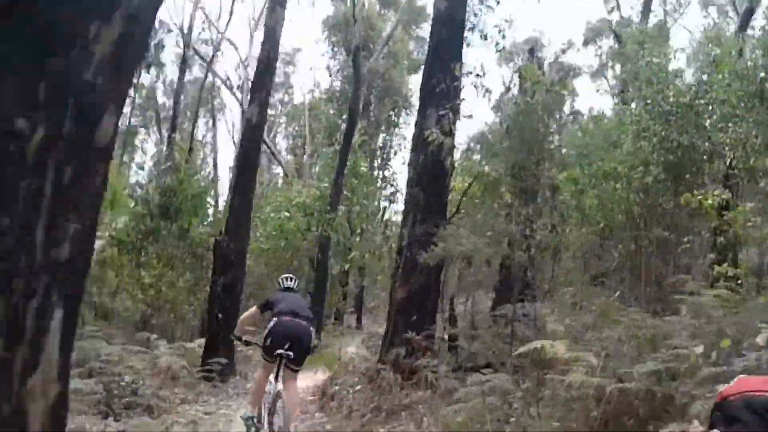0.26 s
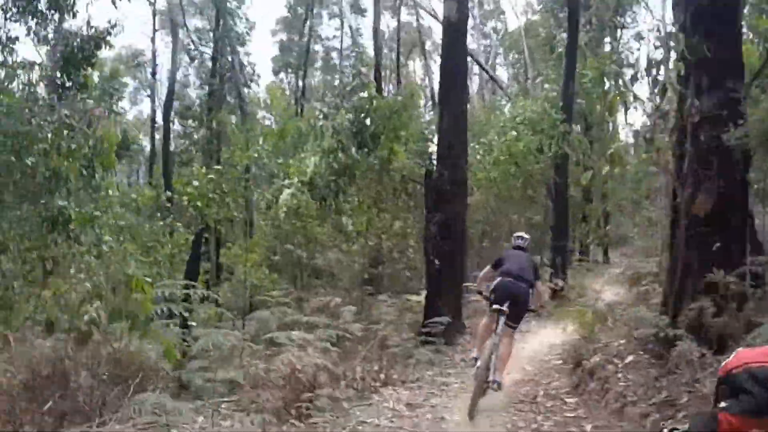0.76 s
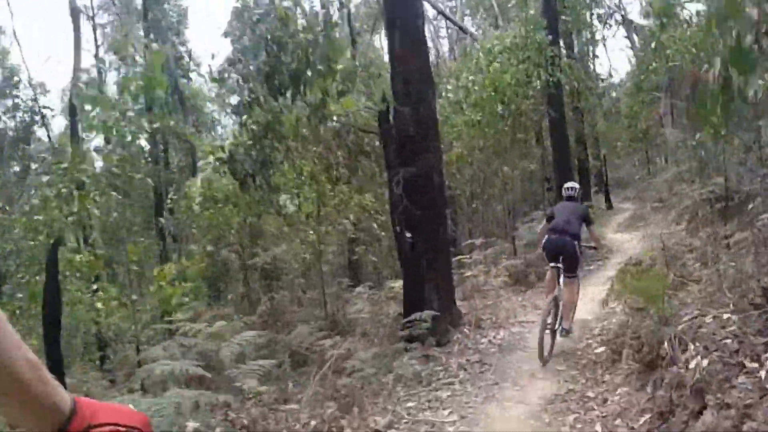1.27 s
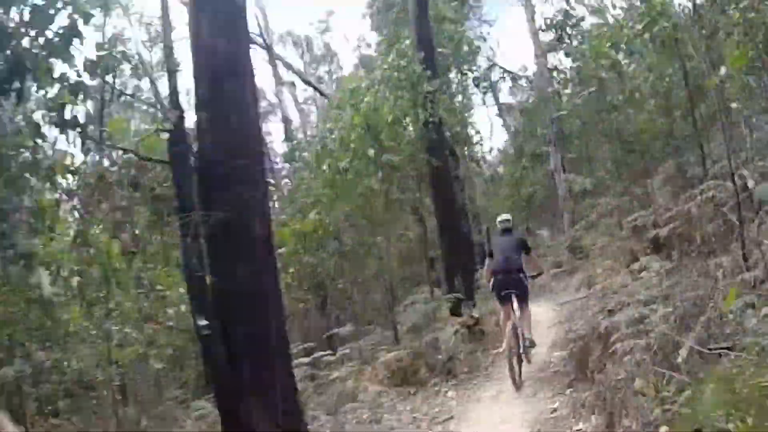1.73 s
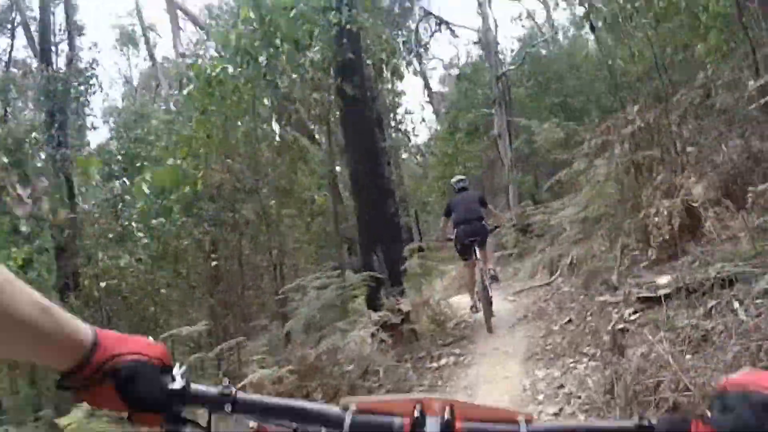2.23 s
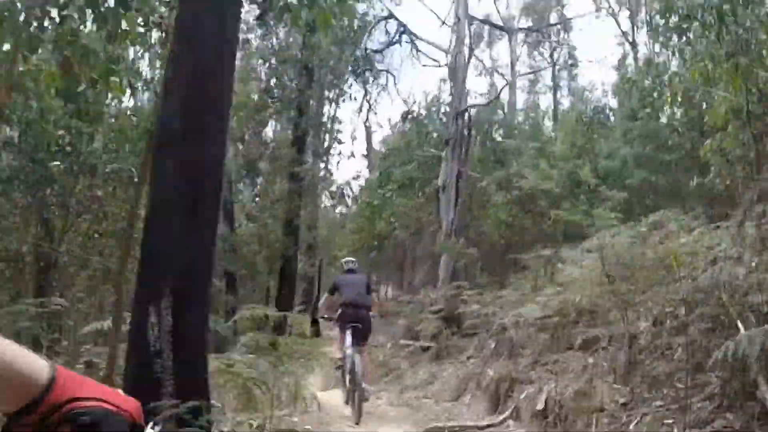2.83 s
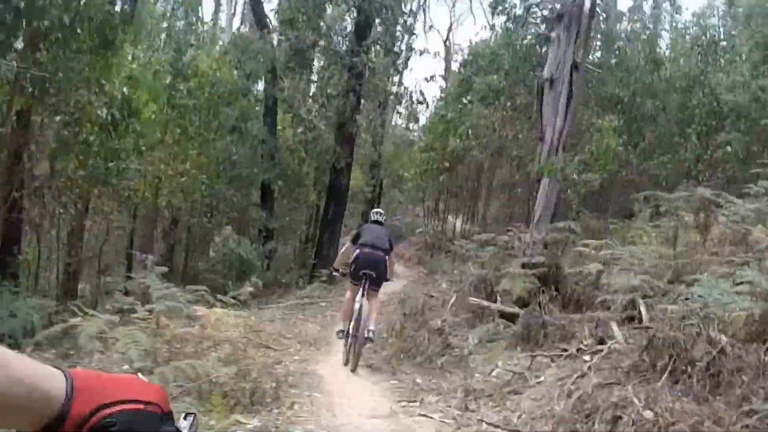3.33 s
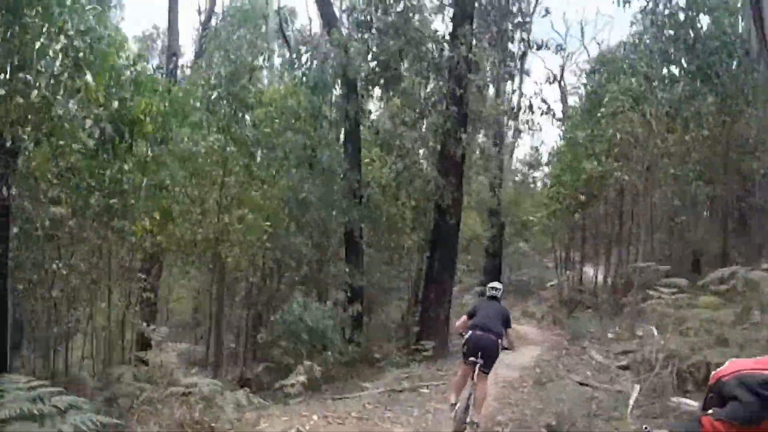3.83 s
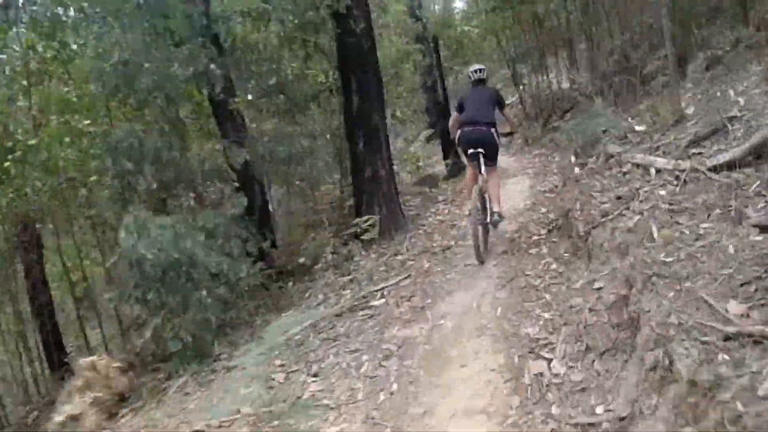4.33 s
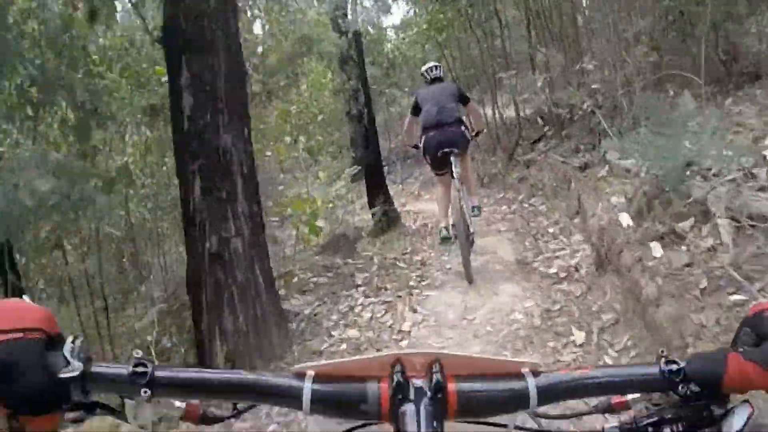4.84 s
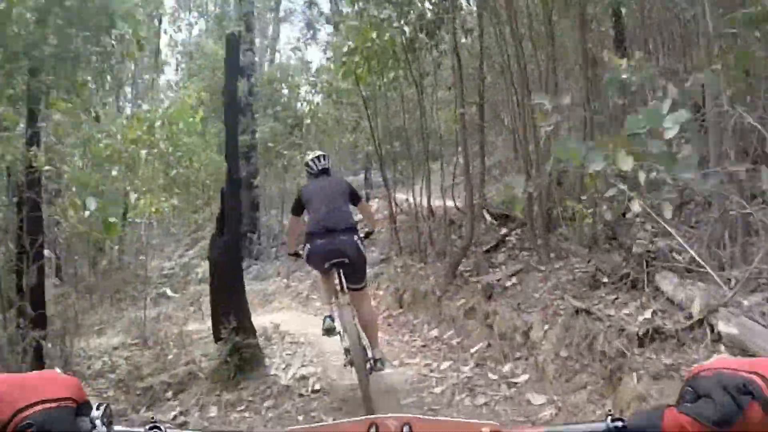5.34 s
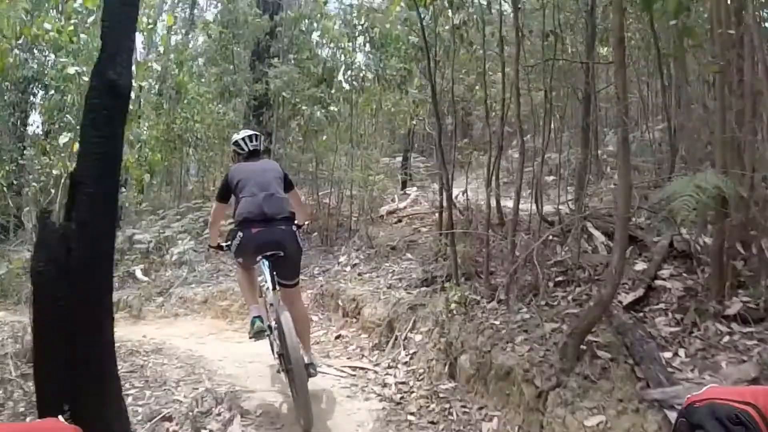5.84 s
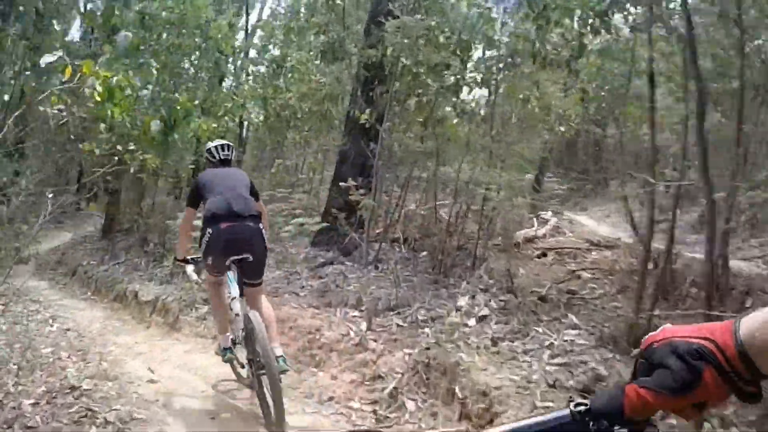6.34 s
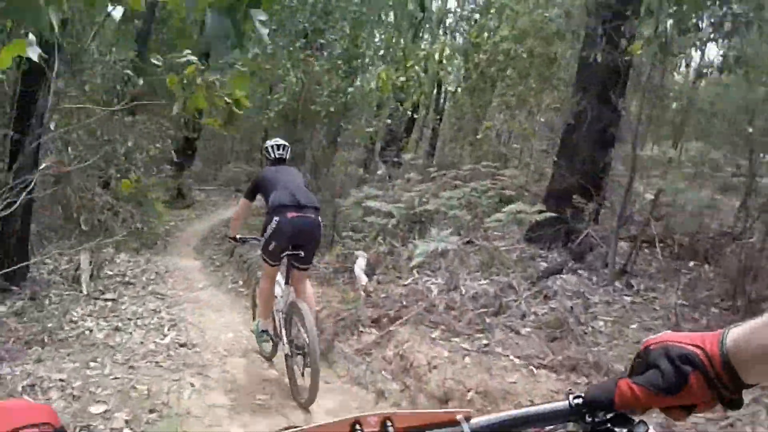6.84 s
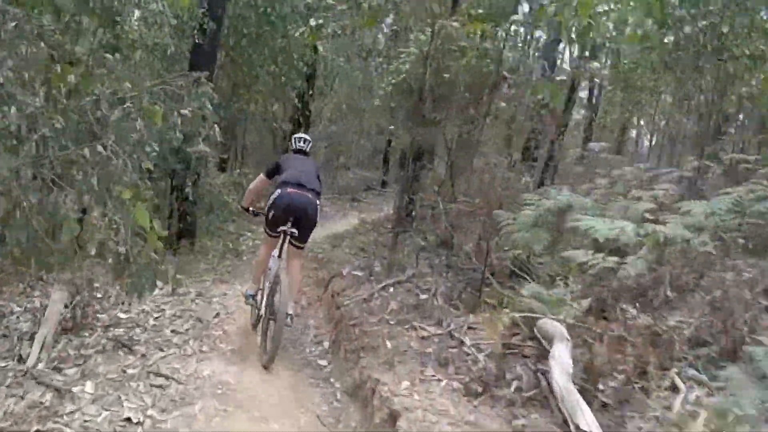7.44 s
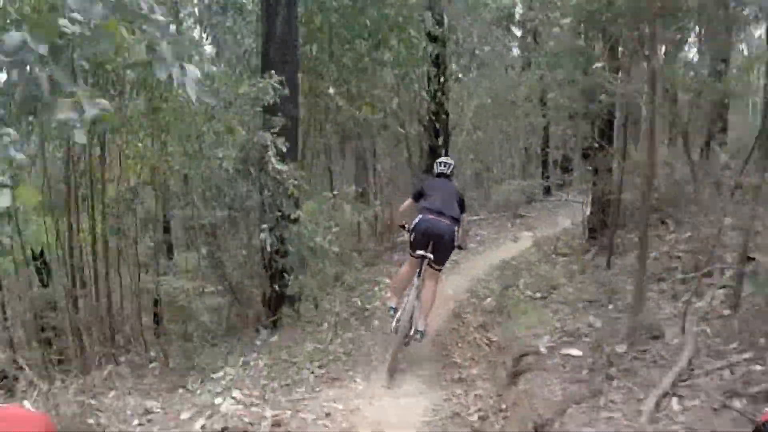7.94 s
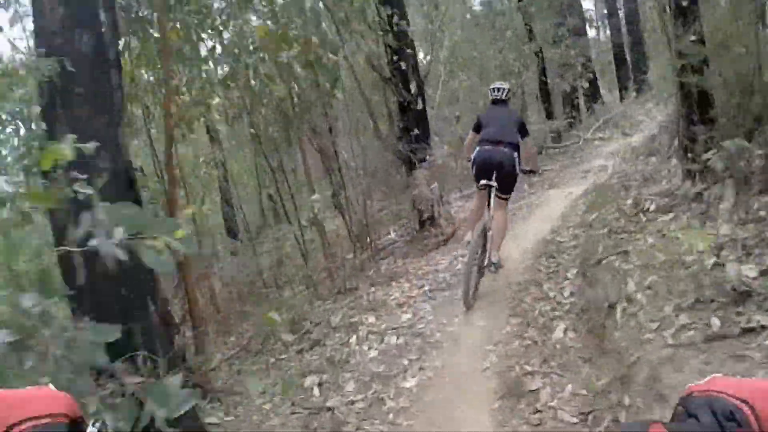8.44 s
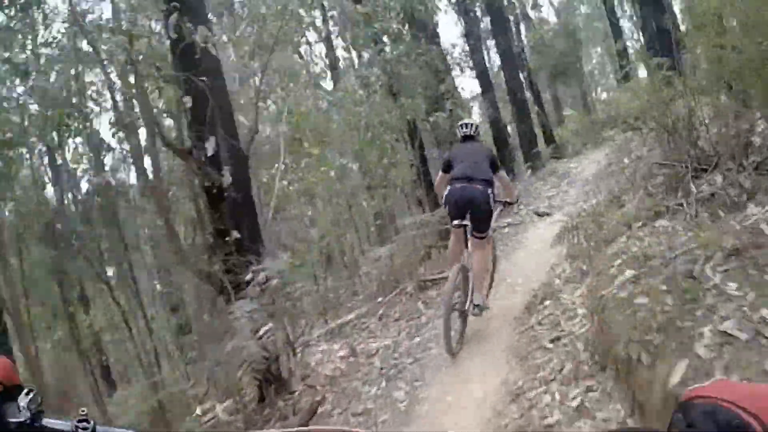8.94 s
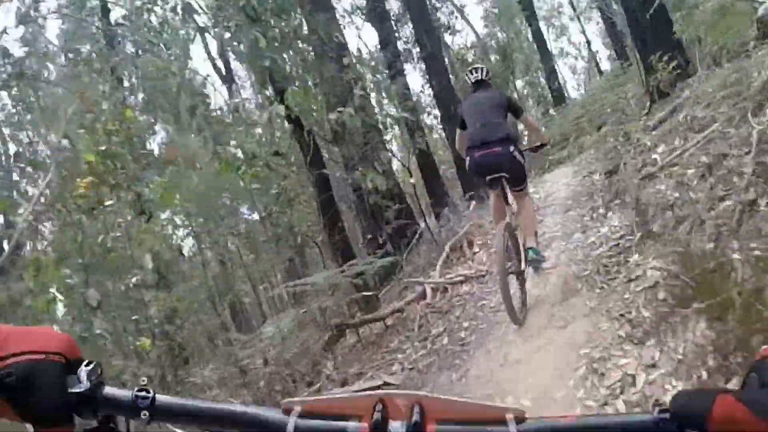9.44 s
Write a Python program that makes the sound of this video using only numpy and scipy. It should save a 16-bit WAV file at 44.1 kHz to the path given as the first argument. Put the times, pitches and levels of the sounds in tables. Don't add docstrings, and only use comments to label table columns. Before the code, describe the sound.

Muffled close sound of trail riding: whirring chain, crunching leaves, metallic chain slaps, dull frame thumps and deep wind rumble inside a closed housing.

```python
import sys
import numpy as np
from scipy import signal
from scipy.fft import rfft, irfft
from scipy.io import wavfile
from scipy.ndimage import uniform_filter1d

SR = 44100
rng = np.random.default_rng(int(sys.argv[2]) if len(sys.argv) > 2 else 0)


def boost_factor(decibels):
    exponent = np.asarray(decibels, float) / 20
    return 10 ** exponent


def waveform_to_disk(signal):
    frames = np.transpose(np.atleast_2d(signal))
    scaled = np.clip(frames, -1, 1) * 32767
    samples = np.round(scaled).astype(np.int16)
    wavfile.write(sys.argv[1], SR, samples)


N = 427329
T = np.arange(N) / SR
HZ = np.maximum(np.fft.rfftfreq(2 ** 19, 1 / SR), .1)

# time in seconds, leaf litter under the tyres in dB, frame rumble in dB,
# wind buffet in dB.
TRAIL = [(0, -75.5, -71.5, -63), (.6, -76, -72, -46.5), (1.3, -74.5, -71, -51.5), (1.9, -72.5, -70, -54),
         (2.5, -70.5, -66.5, -44), (3.3, -81, -71, -55.5), (3.95, -76, -72, -57), (4.35, -72, -67, -47.5),
         (4.85, -73, -68.5, -50.5), (5.4, -74.5, -69.5, -64.5), (6.3, -81, -76.5, -62.5),
         (6.8, -81, -73.5, -54), (7.6, -74, -72, -60.5), (8.2, -73.5, -68.5, -60),
         (8.75, -68.5, -65.5, -49), (9.15, -76.5, -68.5, -64), (9.69, -72.5, -69.5, -57.5)]
# middle in seconds, crunch in dB, half length in seconds.
PATCHES = [(0.018, -68, 0.043), (0.679, -65.5, 0.013), (0.877, -71, 0.0095), (1.044, -73, 0.054),
           (1.452, -63, 0.017), (1.492, -66.5, 0.031), (1.621, -55.5, 0.029), (1.72, -65, 0.072),
           (0.427, -75, 0.013), (2.53, -75, 0.062), (2.803, -68.5, 0.011), (2.874, -66.5, 0.014),
           (2.968, -62, 0.04), (3.042, -65.5, 0.024), (3.153, -68, 0.08), (3.42, -74, 0.038),
           (3.557, -72.5, 0.041), (3.754, -71, 0.078), (3.898, -76, 0.018), (4.066, -67, 0.015),
           (4.52, -66.5, 0.1), (4.606, -66, 0.015), (3.385, -76, 0.013), (4.196, -69, 0.016),
           (6.518, -74, 0.023), (4.652, -63, 0.023), (7.676, -63, 0.017), (7.771, -67, 0.026),
           (7.926, -75, 0.057), (8.34, -73, 0.041), (8.421, -65.5, 0.017), (8.549, -71, 0.031),
           (8.68, -70, 0.045), (8.961, -69.5, 0.056)]
# start in seconds, peak in dB, pitch in Hz.
THUMPS = [(0.215, -47, 68.4), (0.422, -47, 83), (0.5, -48.5, 84), (0.867, -47, 101), (1.307, -50, 53.6),
          (1.713, -46, 54.9), (1.787, -36.5, 126), (2.156, -40, 44.6), (2.509, -42, 160),
          (2.548, -48, 85.5), (2.621, -38.5, 125), (2.969, -37, 87), (3.098, -47, 69), (3.188, -42.5, 149),
          (3.542, -45.5, 53.6), (3.834, -44, 46.1), (3.973, -43, 44.8), (4.108, -45.5, 55),
          (4.499, -48, 59.1), (4.674, -34.5, 56), (4.787, -41, 45), (8.448, -44, 45), (8.558, -57, 67.1),
          (8.929, -59, 83.3), (9.283, -47, 44.55)]
PATCH_SQUARENESS = 4


def unit(x):
    return x / np.sqrt(np.mean(x ** 2))


def curves(table):
    s, *columns = np.transpose(table)
    return [np.interp(T, s, c) for c in columns]


def slope(points):
    hz, db = np.transpose(points)
    return boost_factor(np.interp(np.log(HZ), np.log(hz), db, left=-90, right=-90))


def modes(table):
    return np.sqrt(sum(boost_factor(2 * db) / (1 + ((HZ - hz) / (width / 2)) ** 2) ** 1.3 for hz, width, db in table))


def band(lo_hz, hi_hz):
    return 1 / np.sqrt((1 + (lo_hz / HZ) ** 4) * (1 + (HZ / hi_hz) ** 4))


def through(x, gain):
    size = 2 * len(gain) - 2
    cep = irfft(np.log(gain + 1e-9))
    cep = np.concatenate([cep[:1], 2 * cep[1:size // 2], np.zeros(size // 2)])
    return irfft(rfft(x, size) * np.exp(rfft(cep)))[:N]


def walk(rate_hz):
    k = int(SR / rate_hz)
    held = np.repeat(rng.standard_normal(N // k + 1), k)
    return 1.39 * uniform_filter1d(uniform_filter1d(held, k), k)[:N]


def evened(x, span_s, share):
    span = int(span_s * SR)
    power = uniform_filter1d(uniform_filter1d(x ** 2, span), span)
    return unit(x / power ** (share / 2))


def bursts(times_s, sizes, decay_s, click=0., rise_s=.0001):
    kicks = np.zeros(N)
    np.add.at(kicks, np.clip((np.asarray(times_s) * SR).astype(int), 0, N - 1), sizes)
    fall, rise = np.exp(-1 / (decay_s * SR)), np.exp(-1 / (rise_s * SR))
    envelope = signal.lfilter([1 - rise], np.convolve([1, -fall], [1, -rise]), kicks)
    return click * np.roll(kicks, int(rise_s * SR)) + envelope * rng.standard_normal(N)


def swells(bed_db, s, db, fade_s, squareness):
    t = T[::128, None]
    shape = np.exp(-2 * (np.abs(t - s) / np.maximum(fade_s, .005)) ** squareness)
    power = (boost_factor(2 * db) * shape).sum(axis=1)
    return np.interp(T, t[:, 0], 10 * np.log10(boost_factor(2 * bed_db[::128]) + power))


def pedalling():
    # time in seconds, chain pull in dB, rollers meeting teeth per second.
    strokes = [(-.3, -75, 90), (0.231, -73.5, 83), (0.819, -71.5, 92), (1.3, -71, 69), (1.69, -72, 71),
               (2.201, -69, 90), (2.601, -64, 76), (3.999, -62, 62), (4.46, -65, 79), (4.759, -70, 112),
               (5.13, -69, 102), (5.501, -70, 91), (5.96, -71, 80), (6.45, -69, 69), (7.001, -71.5, 67.5),
               (7.6, -70, 90), (7.93, -69.5, 93), (8.321, -72, 110), (8.681, -68, 108), (8.97, -68, 107),
               (9.362, -68, 102), (9.72, -67.5, 107), (10.05, -69, 107)]
    coast_from_s, coast_to_s, ease_off_s, take_up_s = 2.33, 4.24, .04, 0.29
    coast_pull_db, coast_hiss_db = -84, -99
    sag_db_per_s, hiss_sag_db_per_s, slowing_per_s = -7, -10, .4
    link_hiss_db, bump_pull_db = -11, -11

    s = np.transpose(strokes)[0]
    turn = np.interp(T, s, np.arange(len(s)))
    slack_s = np.sin(np.pi * turn) ** 2 * np.minimum(np.diff(s)[turn.astype(int)], .65)
    push_db, rate = curves(strokes)
    edges = np.minimum((T - coast_from_s) / ease_off_s, (coast_to_s - T) / take_up_s)
    coast = np.clip(edges / 2 + .5, 0, 1)
    pull_db = (1 - coast) * (push_db + sag_db_per_s * slack_s) + coast * coast_pull_db
    hiss_db = (1 - coast) * (push_db + link_hiss_db + hiss_sag_db_per_s * slack_s) + coast * coast_hiss_db
    at_s, crunch_db, half_s = np.transpose(PATCHES)
    pull_db = swells(pull_db, at_s, crunch_db + bump_pull_db, half_s, PATCH_SQUARENESS)
    return pull_db, hiss_db, rate * (1 - slowing_per_s * slack_s * (1 - coast))


def chain():
    # pitch in Hz, width in Hz, level in dB.
    chain_modes = [(1494, 62, -8.5), (2173, 180, -8), (2643, 140, -1.5), (2895, 110, -2.5),
                   (3600, 250, -0.5), (4280, 190, -11), (5800, 130, -18), (5320, 140, -17),
                   (6670, 244, -11.5), (8700, 400, -26), (10720, 200, -20.5), (11550, 250, -22),
                   (12300, 200, -27), (13680, 90, -28)]
    # frequency in Hz, level in dB.
    chain_wash = [(300, -45), (1200, -34.5), (2500, -15), (4000, -19), (7000, -20.5), (7800, -28),
                  (13000, -33), (14300, -61)]
    pull_db, hiss_db, rate = pedalling()
    count = np.cumsum(rate) / SR
    landed = int(count[-1])
    chance = rng.standard_normal((1200, 6))[:landed].T
    times_s = np.interp(np.arange(landed) + 0.054 * chance[0], count, T)
    colour = np.hypot(modes(chain_modes), slope(chain_wash))
    # gain, level in dB, share of landings over sliding
    parts = ((band(7.4, 3200) ** 2, pull_db + 0.5, .8),
             (band(3200, 4800) ** 2, pull_db - 0.5, .82),
             (band(5000, 7800) ** 2, hiss_db + 5.5, .7),
             (band(8700, 11100) ** 3, hiss_db - 8.0, .65),
             (band(11100, 30000) ** 3, hiss_db - 12.0, .6))
    ring = 0
    for (part, db, share), blows in zip(parts, chance[1:]):
        landings = unit(bursts(times_s, boost_factor(2.2 * blows), decay_s=0.004, rise_s=0.0023))
        sliding = boost_factor(3.8 * walk(22)) * rng.standard_normal(N)
        rubbed = unit(through(share * landings + (1 - share) * sliding, colour * part))
        ring = ring + boost_factor(db + 1.16 * walk(6)) * rubbed
    return ring


def tyres():
    # frequency in Hz, level in dB.
    crunch_colour = [(700, -39), (1250, -5), (1600, -3), (2400, -3.5), (3700, -8.5), (5200, -19.5),
                     (8000, -26), (14000, -67.5)]
    # frequency in Hz, level in dB.
    dirt_colour = [(210, -22.5), (350, -3), (1490, -5.5), (2700, -10.5), (3280, -10.5), (3600, -0.5),
                   (4070, -16), (13400, -30)]
    dirt_db = -78
    crunch_db = swells(curves(TRAIL)[0], *np.transpose(PATCHES), PATCH_SQUARENESS)
    chance = rng.random((8000, 2)).T
    grain_sizes = boost_factor(-3.6 * np.log(1.02 - chance[1]))
    grains = unit(bursts(chance[0] * N / SR, grain_sizes, decay_s=0.0014))
    crunch = unit(through(boost_factor(6.0) * grains + rng.standard_normal(N), slope(crunch_colour)))
    dull = unit(through(boost_factor(0.94 * walk(30)) * rng.standard_normal(N), band(480, 1300) ** 1.08))
    dirt = unit(through(boost_factor(walk(15)) * rng.standard_normal(N), slope(dirt_colour)))
    dull_db = 1.14 * (crunch_db + 62) - 66.5
    return boost_factor(crunch_db) * crunch + boost_factor(dull_db) * dull + boost_factor(dirt_db) * dirt


def knocks():
    # start in seconds, peak in dB, dull body in dB, small parts in dB.
    knock_events = [(0.2118, -57, -16, -8), (0.4194, -60, -8, -7), (0.6665, -55, -11, -10),
                    (0.8644, -53, -12, -10), (.878, -57, -3, -14), (1.0057, -59, -1, -20),
                    (1.1556, -55, -19, -15), (1.4721, -44.5, -22, -20), (1.4952, -44.5, -10, -27),
                    (1.594, -62, -14, -11), (1.7645, -57, -8, 6), (1.959, -50, -30, -8),
                    (2.6207, -61, 9.5, -12), (3.1883, -61, 5, -1), (3.376, -60, -18, 3),
                    (7.201, -60, -8, -8), (3.583, -55, -12, -8), (4.0572, -58, -18, 0),
                    (4.459, -45.5, -31, -6), (4.501, -40.5, -16, -2), (4.5348, -42, -18, -2.5),
                    (4.65, -49, -12, -1), (7.9046, -55, -30, -14), (7.951, -53, -6, -6),
                    (8.4203, -53, -23, -8), (8.7092, -49, -17, -9), (8.7533, -46, -18, -1.5)]
    # pitch in Hz, width in Hz, level in dB.
    part_modes = [
        [(1550, 310, 1), (2060, 190, 6)],
        [(2780, 220, -5), (3640, 270, 2), (4250, 590, -17)],
    ]
    decay_s, rise_s = .0016, .0015
    s, db, dull_db, small_db = np.transpose(knock_events)
    large = bursts(s, boost_factor(db + 11.5), decay_s, click=2.0, rise_s=rise_s)
    small = bursts(s, boost_factor(db + small_db + 16.5), decay_s, click=4.4, rise_s=rise_s)
    dull = bursts(s, boost_factor(db + dull_db + 8.0), decay_s=0.0052, click=10.0)
    ringing = through(large, modes(part_modes[0])) + through(small, modes(part_modes[1]))
    return ringing + through(dull, band(120, 1180) ** 1.57)


def slaps():
    # start in seconds, peak in dB, pitch in Hz.
    slap_events = [(0.286, -50, 2640), (0.4678, -53, 2830), (0.8175, -56, 2870), (0.8649, -58, 2880),
                   (1.1567, -54, 2740), (1.286, -48.5, 2660), (1.3458, -54, 3600), (1.4227, -53, 3600),
                   (1.5938, -44, 2240), (1.6262, -35.5, 2240), (1.6372, -41, 2350), (1.766, -47.5, 1960),
                   (1.8636, -45, 3410), (1.898, -48, 3700), (2.3246, -50, 3600), (2.644, -48, 3740),
                   (3.3757, -58, 2120), (3.5309, -54, 2020), (3.5843, -56, 2250), (4.0562, -54, 2170),
                   (4.436, -50, 3600), (4.5, -40, 2670), (4.534, -46, 1510), (4.6497, -46, 2100),
                   (5.1187, -55, 2620), (5.1482, -48, 2690), (5.3757, -53, 2550), (5.7279, -61, 3520),
                   (5.7922, -52, 2560), (5.9901, -50, 2880), (6.2616, -51.5, 3735), (6.2917, -52, 3550),
                   (6.3889, -57, 3580), (6.4174, -51, 2900), (6.6219, -48.5, 3547), (6.8717, -53, 2670),
                   (7.3036, -49, 2670), (7.3688, -52.5, 3590), (7.9052, -48, 1500), (8.091, -51, 3730),
                   (8.2369, -46.5, 3640), (8.3446, -50, 2270), (8.4184, -48.5, 2710), (8.7094, -47, 2133),
                   (8.754, -49, 2730), (9.0344, -51, 3540), (9.1421, -53, 2860), (9.2199, -48, 3620),
                   (9.268, -56, 2564), (9.3177, -49, 3530), (9.3741, -47, 3654), (9.409, -44, 2730),
                   (9.623, -57, 2635)]
    ring_db, t60_s, rise_s, crack_db = -1.5, 0.022, 0.0015, 1
    out, t = np.zeros(N + SR), np.arange(SR // 20) / SR
    for s, db, hz in slap_events:
        envelope = boost_factor(db + ring_db - 60 * t / t60_s) * (1 - np.exp(-t / rise_s))
        out[int(s * SR):][:len(t)] += envelope * np.sin(2 * np.pi * hz * t)
    s, db, _ = np.transpose(slap_events)
    crack = bursts(s, boost_factor(db + crack_db), decay_s=0.0026, click=2.5, rise_s=.001)
    return out[:N] + through(crack, band(1300, 3850) ** 3)


def scrapes():
    # middle in seconds, level in dB, half length in seconds, pitch in Hz.
    scrape_events = [(.215, -73.5, 0.01, 684), (0.671, -71, 0.01, 720), (0.749, -74, 0.051, 1507),
                     (1.009, -68.5, .012, 1400), (1.16, -70.5, 0.0067, 690), (1.456, -67, 0.017, 1870),
                     (1.597, -65, 0.008, 1584), (1.621, -68, 0.034, 668), (1.62, -66, .028, 1100),
                     (1.625, -61, 0.02, 2277), (1.618, -56, 0.024, 2900), (1.638, -61, 0.0095, 1790),
                     (1.63, -64, 0.029, 3820), (1.797, -69, 0.0046, 6800), (2.8, -69.5, 0.0093, 2320),
                     (3.128, -70, .025, 2180), (2.2, -66, 0.053, 2615), (2.969, -68.5, 0.04, 2220),
                     (3.56, -81, 0.036, 2210), (3.57, -72, 0.021, 1484), (3.769, -70.5, 0.023, 2740),
                     (3.925, -69.5, 0.0099, 1430), (4.179, -83, 0.016, 1900), (4.283, -69.5, 0.0096, 1620),
                     (4.664, -69, .012, 2120), (4.831, -68, 0.067, 2586), (5.162, -69, .04, 2680),
                     (5.67, -71, 0.014, 1283), (7.3, -75.5, .025, 1498), (7.61, -71, 0.032, 2660),
                     (7.682, -67, 0.021, 2120), (7.891, -68.5, 0.019, 1526), (8.65, -66, 0.029, 2252),
                     (8.93, -65, 0.032, 2608)]
    width_hz = 150
    out, t = np.zeros(N + SR), np.arange(-SR // 10, SR // 10) / SR
    smooth = signal.butter(1, width_hz / 2, fs=SR)
    for s, db, half_s, hz in scrape_events:
        rub = signal.lfilter(*smooth, rng.standard_normal((2, len(t))))
        hold = np.exp(-(t / max(half_s, .003)) ** PATCH_SQUARENESS)
        ring = hold * (rub[0] * np.cos(2 * np.pi * hz * t) + rub[1] * np.sin(2 * np.pi * hz * t))
        level = boost_factor(db) * np.sqrt(np.sum(hold ** 2) / np.sum(ring ** 2))
        out[int(s * SR) + SR // 10:][:len(t)] += level * ring
    return out[SR // 5:][:N]


def ticks():
    # start in seconds, peak in dB,
    # top edge in dB, colour in Hz.
    tick_events = [(0.0004, -70, -2, 4710), (1.6114, -58, -22, 4450), (1.7514, -63, -23, 4300),
                   (1.7664, -55, -19, 4830), (1.7948, -66, -27, 6700), (1.8976, -61, -20, 5740),
                   (1.956, -52.5, -9.5, 5400), (2.1124, -71, -19, 6660), (2.3285, -58, -25, 4297),
                   (2.4907, -68, -15, 6580), (2.6439, -60, -25, 4400), (3.1593, -65, -24, 5500),
                   (3.1762, -58.5, -29, 5400), (3.3962, -66.5, -24, 6540), (3.4084, -65, -28, 4700),
                   (3.9574, -69, -20, 6600), (3.992, -72, -19, 4370), (4.0412, -66, -21, 5530),
                   (4.2482, -65, -22, 6510), (4.6478, -57.5, -8, 6570), (6.4036, -72, -18, 6510),
                   (6.4174, -67, -22, 6410), (7.4729, -58, -24, 4360), (7.4943, -63, -18, 6580),
                   (7.7867, -61, -26, 6550), (8.5257, -63, -26, 6610), (8.5944, -59, -22, 6350),
                   (8.7675, -54, -31, 6100), (8.8112, -67, -26, 6600), (9.2394, -73, -17, 4336),
                   (9.3956, -63, -16, 4450)]
    s, db, top_db, hz = np.transpose(tick_events)
    out, t = np.zeros(N + SR), np.arange(SR // 40) / SR
    for at_s, gain, centre_hz in zip(s, boost_factor(db), hz):
        crack = (np.exp(-t / 0.0039) - np.exp(-t / 0.0008)) * rng.standard_normal(len(t))
        around = signal.butter(2, [0.74 * centre_hz, 1.14 * centre_hz], "band", fs=SR)
        crack = signal.lfilter(*around, crack)
        out[int(at_s * SR):][:len(t)] += gain * crack / np.abs(crack).max()
    edge = bursts(s, boost_factor(db + top_db + 16.5), decay_s=0.00094, click=3.6, rise_s=.0004)
    edge_gain = np.hypot(band(8800, 13000) ** 2.0, boost_factor(-3.0) * band(4600, 8400) ** 2.0)
    return out[:N] + through(edge, edge_gain)


def thumps():
    lump_db = (-47, -44, -45.5, -56, -46, -44.5, -44, -44)
    lump_hz, first_s, turn_s = 55, 5.291, .4413
    lumps = [(first_s + k * turn_s, db, -lump_hz) for k, db in enumerate(lump_db)]
    out, t = np.zeros(N + SR), np.arange(SR // 4) / SR
    for s, db, hz in list(THUMPS) + lumps:
        swing = np.sin(2 * np.pi * hz * t) * np.exp(-t * abs(hz) / .8)
        out[int(s * SR):][:len(t)] -= boost_factor(db) * swing
    return out[:N]


def lurches():
    # middle in seconds, depth in dB, width in seconds.
    lurch_events = [(0.028, -35.5, 0.024), (0.229, -42.5, 0.017), (0.678, -36, 0.024), (0.884, -39.5, 0.02),
                    (1.403, -37.5, 0.017), (1.531, -38, 0.019), (1.721, -32, 0.02), (1.751, -31, 0.018),
                    (1.797, -32.5, 0.021), (2.149, -38.5, 0.016), (2.321, -33.5, 0.021),
                    (2.413, -39, 0.017), (2.567, -32, 0.03), (2.689, -35, 0.042), (2.984, -27, 0.025),
                    (3.116, -34, 0.026), (3.302, -35, 0.027), (3.607, -35, 0.02), (3.849, -32, 0.03),
                    (4.179, -40.5, 0.02), (4.506, -40, 0.0093), (4.593, -38.5, 0.025), (4.635, -37.5, 0.02),
                    (4.685, -27.5, 0.017), (4.8, -33.5, 0.028), (4.896, -41, 0.02), (5.265, -37.5, 0.028),
                    (7.983, -38.5, 0.021), (8.152, -44, 0.022), (8.709, -43, 0.022), (8.789, -37, 0.017),
                    (8.896, -37.5, 0.022), (9.277, -46, 0.025)]
    rebound, rebound_spread = 0.61, 2.55
    s, db, width_s = np.transpose(lurch_events)
    t = T[::16, None]

    def bell(spread):
        return np.exp(-4 * np.log(2) * ((t - s) / (spread * width_s)) ** 2)

    pressure = rebound * bell(rebound_spread) - (1 + rebound) * bell(0.97)
    return np.interp(T, t[:, 0], pressure @ boost_factor(db))


def wind():
    # peak in seconds, level in dB, time to fade 9 dB in seconds.
    gusts = [(0.269, -44, 0), (1.0, -51, -0.1), (1.45, -55, 1.6), (1.78, -35, 0.08), (2.1, -46, -0.4),
             (2.4, -49, 1.65), (3.031, -38, -0.2), (3.701, -50.5, 0.5), (4.4, -56, -1.3),
             (5.61, -54.5, 1.1), (6.529, -45, -0.2), (7.37, -53, 0.3), (8.05, -46, 0.16),
             (8.42, -52.5, -0.04), (8.58, -49.5, 0.65), (9.28, -57.5, 0)]
    # start in seconds, peak in dB.
    shudders = [(0.199, -59), (0.35, -68), (0.414, -49.5), (0.658, -55), (0.711, -54), (0.868, -64),
                (0.989, -61), (1.181, -65), (1.397, -57), (1.482, -48.5), (1.531, -65), (1.61, -52),
                (1.704, -50), (1.783, -48), (2.013, -67), (2.093, -55), (2.202, -56), (2.283, -55),
                (2.503, -55), (2.616, -49.5), (2.706, -64), (2.783, -53), (2.962, -49), (3.183, -62),
                (3.273, -55), (4.029, -63), (4.348, -64), (4.406, -63), (4.523, -44), (4.656, -53),
                (4.747, -53), (4.987, -57), (5.078, -65), (5.182, -57), (5.238, -62), (5.306, -64),
                (5.717, -67), (6.05, -66), (6.154, -60), (6.516, -62), (6.969, -59), (7.177, -53.5),
                (7.738, -54), (7.954, -52.5), (8.043, -60), (8.152, -55), (8.223, -62), (8.304, -56),
                (8.409, -65), (8.814, -55), (8.984, -51), (9.204, -60), (9.286, -67), (9.412, -58),
                (9.587, -55)]
    # frequency in Hz, level in dB.
    rumble_colour = [(24, -27), (40, -12), (75, -7.5), (237, -20), (350, -25), (600, -41.5), (780, -71.5),
                     (1320, -120)]
    # frequency in Hz, level in dB.
    buffet_colour = [(2, -13.5), (5, -6.5), (9, -1.5), (16, 2), (25, -6.5), (40, -15), (70, -39.5),
                     (200, -64.5)]
    squareness = 1.1

    _, rumble_db, buffet_db = curves(TRAIL)
    buffet_db = swells(buffet_db, *np.transpose(gusts), squareness)
    s, db, hz = np.transpose(THUMPS)
    bump_db = db - 33 - 4 * np.log2(hz / 60)
    rumble_db = swells(rumble_db - 1.5, s, bump_db, 0.034, squareness)
    s, db, half_s = np.transpose(PATCHES)
    rumble_db = swells(rumble_db, s, -67 + 0.55 * (db + 67.5), half_s, squareness)
    s, db = np.transpose(shudders)
    rumble_db = swells(rumble_db, s + 0.011, db - 10.5, 0.017, squareness)

    buffet = through(rng.standard_normal(N), slope(buffet_colour))
    buffet = evened(buffet, span_s=0.074, share=0.56)
    rumble = 0
    for hz in (30, 60, 120, 240, 480):
        octave = evened(through(rng.standard_normal(N), band(hz, 2 * hz)), span_s=.04, share=.75)
        rumble = rumble + boost_factor(1.6 * walk(30)) * octave / np.sqrt(30 / hz)
    rumble = unit(through(rumble, slope(rumble_colour)))
    return buffet * boost_factor(buffet_db) + rumble * boost_factor(rumble_db + 3.5 + 1.1 * walk(40))


def scene():
    bike = chain() + tyres() + knocks() + slaps() + scrapes() + ticks()
    return (bike + thumps() + lurches() + wind())[None]


def top_cut(x):
    return signal.sosfilt(signal.butter(12, 14300, fs=SR, output="sos"), x)


def record(dry):
    # centre in Hz, width in Hz, level in dB.
    housing = [(327.5, 36, 3), (660, 27, 4), (1220, 120, -3), (3276, 110, -9), (4023, 140, -9.5),
               (5000, 160, -5), (6020, 120, -3.5), (7970, 390, -5), (12200, 290, -6.5), (15000, 2000, -7.5)]
    colour_db = sum(db / (1 + ((HZ - hz) / (width / 2)) ** 2) for hz, width, db in housing)
    mix = through(dry[0], boost_factor(colour_db))[None]
    return top_cut(mix)


dry = scene()
out = record(dry)
waveform_to_disk(out)
```